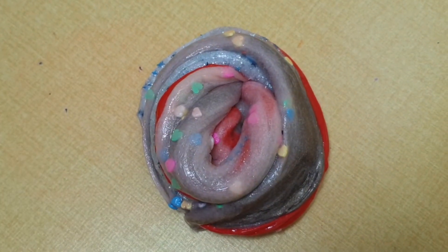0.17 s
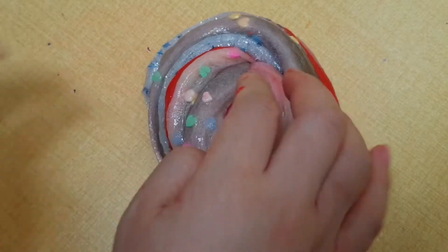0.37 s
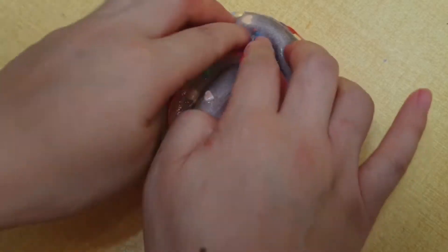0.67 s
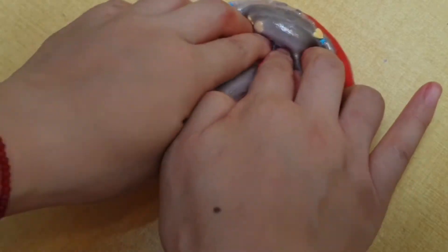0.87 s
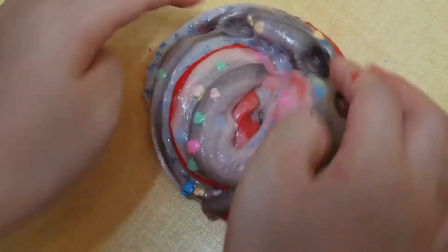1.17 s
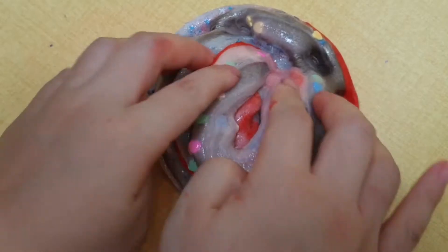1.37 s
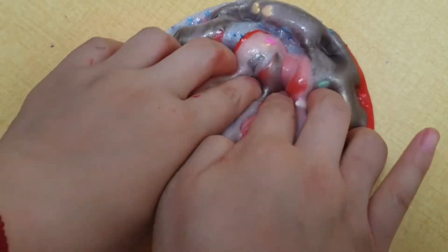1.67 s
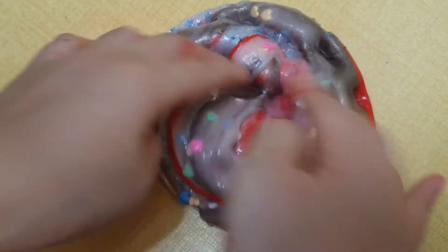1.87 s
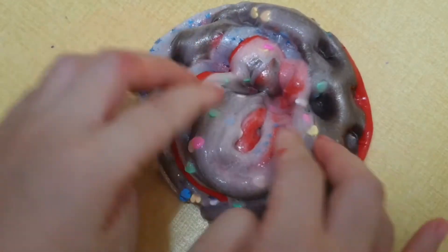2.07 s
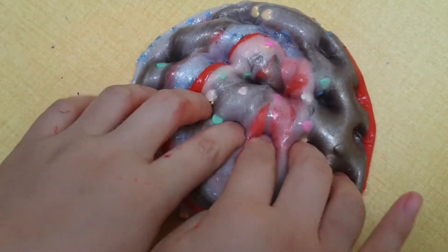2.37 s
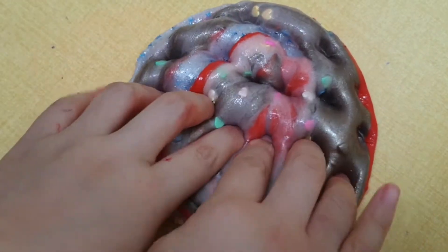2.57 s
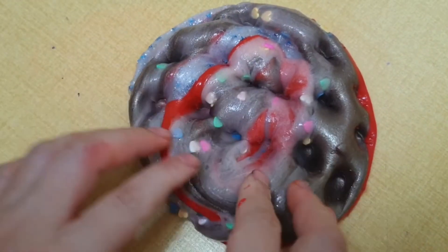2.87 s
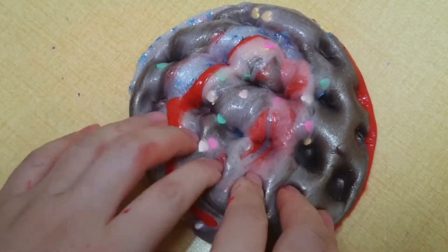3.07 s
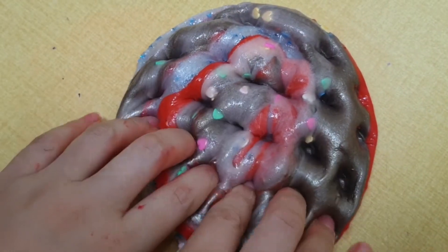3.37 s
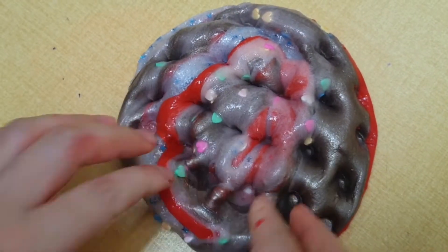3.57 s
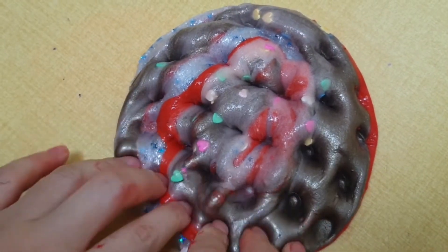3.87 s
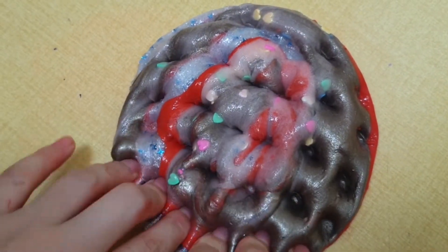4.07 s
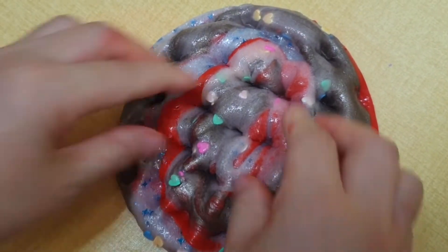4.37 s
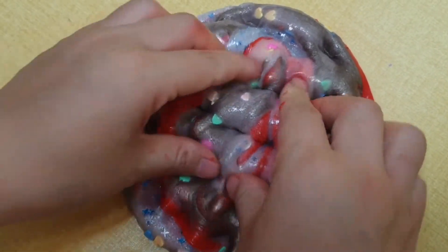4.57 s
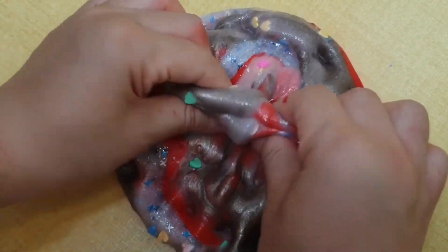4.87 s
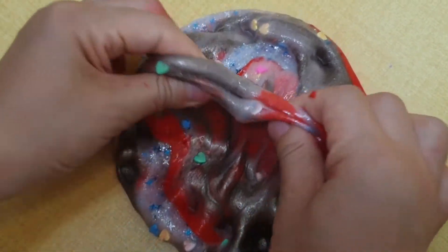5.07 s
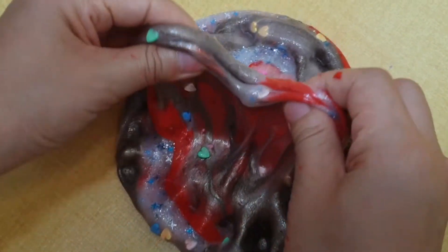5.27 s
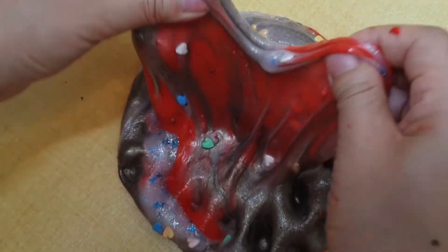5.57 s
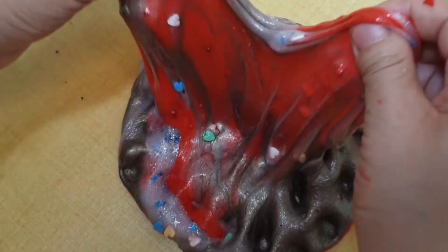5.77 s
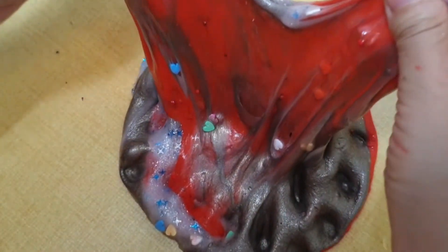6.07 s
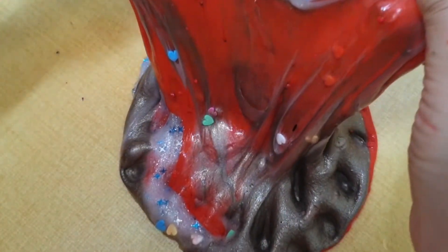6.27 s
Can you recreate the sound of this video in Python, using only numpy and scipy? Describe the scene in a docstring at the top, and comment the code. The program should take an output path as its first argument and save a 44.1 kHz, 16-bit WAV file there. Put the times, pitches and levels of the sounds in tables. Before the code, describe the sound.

A close stereo microphone in a small, hard-surfaced, quiet room, with a faint steady hum, soft hiss and low table rumble. For the first second, hands settle on sticky slime with barely audible fizz. Around 1.05 s fingers pull free in a tight burst of hollow, wet pops and snaps, with smaller clicks to 1.2 s. A dull palm thud comes near 1.45 s. From 1.8 to 1.9 s comes a dense, loud cluster of pops and cracks. Small pops at 2.3 and 2.5 s lead to another sharp cluster at 2.6-2.7 s. Low rumble swells near 3.1 s amid fine crackle and squelch; bright snaps burst at 3.45 s. A soft knock lands at 3.9 s, weaker pops follow at 4.15 s, then a crisp crackling rip at 4.65 s thins out. The remaining stretch is quiet, with tiny ticks, small rising blips near 5.5 s and light clicks around 5.95 s, until about 6.4 s.

```python
"""Small hard room, tabletop: fingers poke, pull out of and stretch a lump of sticky slime by a two-port microphone.
Snapping films are clicks with a short rattle; finger holes and air pockets are decaying, rising tones.
Thousands of faint bursts fizz and small wet tones gurgle as the kneading drives them; the room echoes.
Behind: low-mode noise of the table as the hands lean and palms land, a steady hum, microphone hiss."""
import sys
import numpy as np
from scipy import signal
from scipy.fft import rfft, irfft, next_fast_len
from scipy.io import wavfile
from scipy.ndimage import uniform_filter1d

SR = 44100
rng = np.random.default_rng(int(sys.argv[2]) if len(sys.argv) > 2 else 0)


def magnitude_from_level(level_db):
    """Linear magnitude for a level in decibels (20 dB per decade)."""
    exponent = np.asarray(level_db, float) / 20
    return 10 ** exponent


def master(y):
    """Save y as 16-bit WAV."""
    cut = np.clip(np.atleast_2d(y).T, -1, 1)
    pcm = np.round(cut * 32767)  # scale
    wavfile.write(sys.argv[1], SR, pcm.astype(np.int16))


N = 283562


def unit(x):
    """Rows brought to rms 1."""
    return x / np.sqrt(np.mean(x ** 2, axis=-1, keepdims=True) + 1e-20)


def along(points, hz):
    """(Hz, value) points interpolated on a log frequency axis."""
    f, v = np.transpose(points)
    return np.interp(np.log(hz + 1), np.log(f + 1), v)


def curve(rows, column, s):
    """One column of a table at times s."""
    return np.interp(s, np.transpose(rows)[0], np.transpose(rows)[column])


def noise(spectrum, alike):
    """Shaped stereo noise of rms 1; alike is the left-right correlation."""
    m = next_fast_len(N)
    gain = magnitude_from_level(along(spectrum, np.fft.rfftfreq(m, 1 / SR)))
    a, b = unit(irfft(rfft(rng.standard_normal((2, m))) * gain, m)[:, :N])
    turn = np.arccos(np.clip(alike, 0, 1)) / 2
    return np.cos(turn) * a + np.sin(turn) * np.array([b, -b])


def place(s, sounds, pan_db):
    """Sums stereo sounds (events, 2, samples) at their times; pan_db is left over right."""
    start = np.round(np.clip(s, 0, None) * SR).astype(int)
    at = start[:, None] + np.arange(sounds.shape[-1])
    gains = magnitude_from_level(np.array([pan_db, -pan_db]) / 2)
    return np.array([np.bincount(at.ravel(), (g[:, None] * sounds[:, c]).ravel(), N + SR)[:N]
                     for c, g in enumerate(gains)])


def bursts(s, db, bright_db_oct, pan_db, t60_s, ring_db):
    """A film snaps as a click and a short rattle, a little different at each port, later at the right."""
    # spectrum of a bursting film: (frequency [Hz], relative level [dB])
    film = [(800, -17.5), (2000, -7), (4000, -4.5), (5500, -1.5), (7500, 1.5), (9500, -1), (12000, -1),
            (15500, -1.5), (16600, -35.5), (19000, -69)]
    t, hz = np.arange(-64, 448) / SR, np.fft.rfftfreq(512, 1 / SR)
    raw = rng.standard_normal((len(s), 3, len(t)))
    rattle = (raw[:, :1] + raw[:, 1:]) * magnitude_from_level(-60 * t / t60_s) * (t > 0)
    click = 3 * (t == 0)
    spectrum = rfft(rattle + click)
    spectrum = spectrum / np.sqrt(uniform_filter1d(abs(spectrum) ** 2, size=9) + 1e-9)  # no pitch of its own
    octaves = np.log2(np.clip(hz, 1500, 15000) / 8000)
    tilt_db = bright_db_oct[:, None, None] * octaves  # smaller bubbles are brighter
    tilt_db = tilt_db + ring_db / (1 + ((hz - 7500) / 900) ** 2)  # a resonance near 7.5 kHz
    lag_s = np.array([[0], [.00007]])
    lag = np.exp(-2j * np.pi * hz * lag_s)
    pair = irfft(spectrum * magnitude_from_level(along(film, hz) + tilt_db) * lag)
    size = np.sqrt(np.sum(pair ** 2, axis=(1, 2), keepdims=True) / (.002 * SR))  # two ports, 1 ms each
    return place(s + t[0], magnitude_from_level(db)[:, None, None] * pair / size, pan_db)


def pockets(s, db, hz, cycles, pan_db, rise, rough):
    """A pocket rings for some cycles (to -60 dB), pitch climbing as its mouth widens; wet walls make it flutter."""
    turns = hz[:, None] * np.arange(1400) / SR
    age = turns / np.clip(cycles, 2, 40)[:, None]
    ring = np.sin(2 * np.pi * turns * (1 + rise * (np.minimum(age, 1) - .15)))
    flutter = unit(uniform_filter1d(rng.standard_normal(turns.shape), size=40))
    decay = magnitude_from_level(db[:, None] - 60 * age)
    onset = (1 - np.exp(-turns / 0.25)) ** 2
    ring = ring * (1 + rough * flutter) * decay * onset
    later = np.roll(ring, shift=3, axis=1)
    return place(s, np.stack([ring, later], axis=1), pan_db)


def snaps():
    """Single films tear and bubbles burst."""
    # films and bubbles: (time [s], level over 1 ms [dB], brightness [dB/octave], left over right [dB])
    films = [(0.332, -55.5, 8, 7), (0.8704, -46.5, 6, -12.5), (1.0633, -20, -8, 1), (1.0715, -26, -7, -2),
             (1.158, -41, 6, 0.5), (1.1821, -41.5, 14, -1.5), (1.4429, -51.5, 7, -4),
             (1.8028, -16.5, -3.5, -1.5), (1.8059, -15.5, -5.5, 1.5), (1.8328, -17, 7, -6),
             (1.8394, -16, 3.5, -1.5), (1.8461, -29, 9, 1.5), (1.8877, -23, -1, -4), (2.2157, -38.5, 1, -2),
             (2.2749, -26, 16, -3.5), (2.3683, -37.5, 5.5, -0.5), (2.5825, -40, 8, 1),
             (2.6071, -23.5, -0.5, 1.5), (2.646, -12.5, 4.5, -2), (2.652, -24, 2.5, -1.5),
             (2.666, -33.5, 2, 0), (2.684, -26, 0.5, 1.5), (3.2651, -54, 19, -6.5), (3.434, -20, 9.5, 2.5),
             (3.437, -17.5, 3, 1.5), (3.4378, -19.5, 3, -1), (3.4729, -15.5, -2, -1.5),
             (3.6474, -40.5, 11.5, -1), (3.9257, -43.5, -2, 0.5), (3.9887, -42, 4.5, -3.5),
             (4.133, -28, 0, 3), (4.135, -26.5, 1, 0.5), (4.158, -31, -2, -1), (4.5766, -44, 2.5, -2),
             (4.6348, -19.5, 1.5, 4.5), (4.676, -15, 10, -3), (4.803, -36, 8, -1.5), (4.826, -34, 6.5, -12),
             (4.8421, -37.5, 6, 9.5), (4.929, -40, 1, 1.5), (4.9902, -41, 5, 4.5), (5.008, -38, 0.5, 4),
             (5.0267, -46, 1.5, -6), (5.031, -43, 11, 0.5), (5.0347, -38.5, 16, 0.5), (5.1603, -42, 11, 3),
             (5.178, -46, 18, 3.5), (5.2653, -42, 5.5, -2.5), (5.5674, -28.5, 3.5, -0.5),
             (5.9436, -41, -1.5, 2.5), (6.141, -51.5, 0, 1), (6.297, -55, -4, -0.5)]
    s, db, bright_db_oct, pan_db = np.transpose(films)
    ring_db = 3.5 + np.clip(-.8 * (db + 42), 0, 12)[:, None, None]  # quieter snaps ring more near 7.5 kHz
    return bursts(s, db, bright_db_oct, pan_db, t60_s=0.005, ring_db=ring_db)


def plops():
    """Air pockets and finger holes ring as they open."""
    # openings: (time [s], level [dB], nominal pitch [Hz], ringing [cycles, held to 2..40])
    openings = [(0.7235, -51, 826, 8.8), (1.0309, -41, 390, 11), (1.045, -19.5, 1680, 10.4),
                (1.0541, -13, 1485, 14.9), (1.0564, -14, 1820, 13), (1.063, -30.5, 343, 6.8),
                (1.0635, -24.5, 860, 8.9), (1.0646, -15.5, 2800, 11), (1.067, -19.5, 1780, 11.9),
                (1.1416, -29, 1300, 4.2), (1.154, -42, 1390, 4.2), (1.522, -53, 1250, 11),
                (1.54, -51.5, 1600, 12), (1.5745, -49, 762, 12), (1.576, -49, 1200, 16),
                (1.627, -38, 331, 7.7), (1.8005, -22, 800, 16), (1.8008, -20.5, 1820, 11.6),
                (1.8019, -14.5, 404, 9.6), (1.8141, -22.5, 1117, 17), (1.833, -16.5, 1580, 20.6),
                (1.836, -11.5, 814, 13.4), (1.8387, -10.5, 2400, 10.7), (1.8522, -16, 870, 9.2),
                (1.869, -27, 810, 7.5), (1.887, -22, 1770, 13.5), (1.923, -30, 876, 12),
                (2.3286, -49.5, 1120, 54), (2.4153, -51.5, 375, 18), (2.4862, -24, 1144, 11.6),
                (2.4868, -29, 780, 9.5), (2.4875, -26, 420, 8.87), (2.6085, -28.5, 2850, 27),
                (2.6065, -24.5, 734, 9.9), (2.608, -29, 1265, 15), (2.6082, -22, 467, 13.7),
                (2.638, -18.5, 1490, 8.1), (2.645, -13, 1610, 10.5), (2.6466, -19.5, 780, 12.5),
                (2.65, -20, 445, 9.5), (2.6445, -18, 2870, 26), (2.652, -13.5, 730, 11.9),
                (2.683, -24.5, 583, 11), (2.739, -29.5, 590, 6.6), (3.113, -40.5, 1094, 17.6),
                (3.128, -41, 1210, 11.3), (3.164, -40.5, 1170, 14), (3.184, -46.5, 1130, 18),
                (3.2655, -31.5, 1530, 10.4), (3.266, -41, 2900, 18), (3.2665, -42.5, 693, 11),
                (3.436, -25, 385, 15.6), (3.4354, -20.5, 1123, 18), (3.4364, -24, 2170, 15),
                (3.4365, -19, 754, 17.5), (3.466, -25.5, 720, 8.5), (3.4693, -17, 1560, 11),
                (3.4721, -16.5, 1790, 12.7), (3.4725, -15, 7600, 28), (4.1232, -32, 8200, 22),
                (4.134, -33, 2000, 13), (4.147, -35, 1093, 11), (4.1492, -35, 700, 8),
                (4.166, -38, 1520, 8.6), (4.5035, -50.5, 2200, 11), (4.503, -37.5, 1098, 6),
                (4.5044, -36.5, 405, 9.3), (4.5501, -42, 8200, 25), (4.6318, -35, 410, 7.9),
                (4.6754, -35, 2525, 19), (4.929, -29, 5900, 14), (4.9293, -31, 4400, 14),
                (5.45, -60, 1803, 23), (5.468, -52, 1890, 38), (5.482, -48.5, 2000, 29),
                (5.51, -52.5, 2110, 21), (5.9445, -39, 2800, 14), (5.9427, -43, 794, 10.7)]
    pan_db = rng.normal(-1.1, 4.42, len(openings))
    return pockets(*np.transpose(openings), pan_db=pan_db, rise=0.012, rough=0.44)


def rips(count=11):
    """A ripping sheet is a quick run of snaps gathering force in uneven steps, scattered left and right."""
    # ripping sheets: (start [s], length [s], final mean level [dB], mean brightness [dB/octave])
    sheets = [(1.026, 0.014, -34, 3), (1.041, 0.0079, -24.5, -0.5), (1.83, .011, -18.5, -1),
              (2.637, .013, -16.5, -2), (3.463, .011, -19.5, -2), (4.677, 0.06, -29, 13)]
    at, length, db, bright_db_oct = np.transpose(sheets)[..., None]
    u, g = rng.random((len(sheets), count)), rng.standard_normal((len(sheets), count, 3))
    step = np.arange(count)
    s = at + length * (step + .8 * u) / count
    level_db = db - 6.0 * (1 - step / count) ** 2 + 1.3 * g[..., 0]
    rows = s, level_db, bright_db_oct + 3 * g[..., 1], -1.5 + 4 * g[..., 2]
    return bursts(*(r.ravel() for r in rows), t60_s=0.005, ring_db=2.5)


def swell(s, at, rise_s, fade_s, hold_s=0):
    """dB re peak at times s, a row per gesture: straight rise, hold, straight fade; rise and fade per 20 dB."""
    late = s - np.reshape(at, (-1, 1))
    rise, fade, hold = (np.reshape(v, (-1, 1)) for v in (rise_s, fade_s, hold_s))
    return -20 * (np.maximum(-late, 0) / rise + np.maximum(late - hold, 0) / fade)


def kneading(s):
    """Fizz dB, squelch dB and squelch pitch at times s: gestures add up, the wettest sets the pitch."""
    # presses, stretches: (peak time [s], fizz drive [dB], squelch drive [dB], pitch [Hz], fade per 20 dB [s])
    presses = [(.35, -66, -76, 893, 0.1), (.8, -68.5, -62.5, 1118, 0.26), (1.57, -72, -62, 1240, 0.05),
               (2.24, -59, -65.5, 1484, 0.11), (2.33, -66, -59, 1109, 0.14), (2.5, -72, -54, 901, 0.03),
               (3.13, -54, -57, 1287, 0.14), (3.95, -64.5, -57, 1593, 0.22), (4.515, -72, -55.5, 950, 0.03),
               (4.7, -47, -86.5, 1970, 0.21), (4.95, -62, -66, 1246, 0.64), (5.3, -66, -81, 1500, 0.5),
               (5.479, -60, -69.5, 1980, 0.0031), (6.2, -67.5, -89, 1490, 0.43)]
    # fingers pulling out of their holes: (time of letting go [s], fizz drive [dB], squelch drive [dB])
    pulls = [(1.062, -31, -36.5), (2.638, -33, -38), (3.465, -26.5, -68.5), (4.155, -35, -38)]
    swell_share, rest_db = .35, -88  # rise time over fade time of a press; drive of the lump at rest
    pull_s, let_go_s, pull_hz = .035, .01, 1350  # rise and fade per 20 dB, pitch
    at, fizz_db, wet_db, hz, fade = np.transpose(presses)
    pull_at, pull_fizz_db, pull_wet_db = np.transpose(pulls)
    shape_db = np.vstack([swell(s, at, swell_share * fade, fade), swell(s, pull_at, pull_s, let_go_s)])
    fizzing = magnitude_from_level(shape_db + np.r_[fizz_db, pull_fizz_db][:, None])
    wet = magnitude_from_level(shape_db + np.r_[wet_db, pull_wet_db][:, None])
    pitch_hz = np.r_[hz, pull_hz + 0 * pull_at][wet.argmax(axis=0)]
    return *(20 * np.log10(g.sum(axis=0) + magnitude_from_level(rest_db)) for g in (fizzing, wet)), pitch_hz


def fizz(count=5000):
    """Countless small bubbles burst, a few much larger than the rest; harder kneading bursts them faster."""
    u, g = rng.random((count, 2)), rng.standard_normal((count, 2))
    t = np.arange(0, N, 32) / SR
    crowd = magnitude_from_level(.3 * kneading(t)[0])
    s = np.interp(u[:, 0], np.cumsum(crowd) / np.sum(crowd), t)
    effort_db = kneading(s)[0]
    db = 0.87 * effort_db - 13.5 - 2.495 * np.log(u[:, 1] + 0.016)
    ring_db = np.clip(-.45 * (effort_db + 44.5), 0, 14)  # gentle fizz is more coloured near 7.5 kHz
    db = db - .2 * ring_db * (np.log(u[:, 1] + .002) + 2)  # and lets single ticks stand out
    bright_db_oct, pan_db = -.5 + 4 * g[:, 0], -1.5 + 4 * g[:, 1]
    return bursts(s, db, bright_db_oct, pan_db, t60_s=0.0021, ring_db=ring_db[:, None, None])


def squelch(count=1800):
    """Small wet pockets gurgle, scattered about the pitch of the hole being worked."""
    u, g = rng.random((count, 2)), rng.standard_normal((count, 2))
    s = u[:, 0] * N / SR
    _, wet_db, hole_hz = kneading(s)
    db = wet_db - 3.4 * np.log(u[:, 1] + 0.019)
    hz = hole_hz * np.exp(0.37 * g[:, 0])
    return pockets(s, db, hz, 12 + 0 * s, 4 * g[:, 1], rise=0.092, rough=0.14)


def room(x, size=1764):
    """Walls echo, then a diffuse tail, drawn afresh every size samples."""
    # decay of the tail after its hold: (frequency [Hz], t60 [s])
    decay = [(200, 0.25), (1400, 0.26), (3700, 0.27), (9700, 0.27), (16000, 0.26)]
    # near surfaces and a far wall: (delay [s], level [dB])
    walls = [(.0023, -17), (.0047, -19.5), (.0068, -18), (.05, -20)]
    hold_s = 0.016  # early echoes keep the tail level
    parts = np.pad(x, ((0, 0), (0, -N % size))).reshape(2, -1, size)
    hz, t, z = signal.stft(rng.standard_normal((2, parts.shape[1], SR // 2)), SR, nperseg=256)
    alike = 1 / (1 + (hz[:, None] / 300) ** 2)  # long waves reach both ports alike
    z = np.sqrt(alike) * z[:1] + np.sqrt(1 - alike) * z[::-1]
    fade = magnitude_from_level(-60 * np.maximum(t - hold_s, 0) / along(decay, hz)[:, None])
    less_bass = (hz / (hz + 250))[:, None]  # a small room holds less bass
    tails = signal.istft(z * fade * less_bass, SR, nperseg=256)[1]
    tails = tails * (1 - np.exp(-np.arange(tails.shape[-1]) / SR / 0.00046))  # the tail builds up
    lumps = uniform_filter1d(rng.standard_normal(tails.shape[1:]), size=130)
    tails = tails * magnitude_from_level(3.2 * unit(lumps))  # echoes arrive in clumps
    tails = magnitude_from_level(-1.5) * tails / np.linalg.norm(tails, axis=-1, keepdims=True)
    for s, db in walls:
        tails[..., round(s * SR)] += magnitude_from_level(db)
    wet, out = signal.fftconvolve(parts, tails, axes=-1), np.zeros((2, N + SR))
    for k in range(parts.shape[1]):
        out[:, k * size:][:, :wet.shape[-1]] += wet[:, k]
    return out[:, :N]


def table():
    """Two low modes of the table rumble, stronger at the right port; soft thuds come when palms land."""
    # weight on the table: (time [s], rumble ahead of port gains [dB], part in the upper mode [dB])
    lean = [(0, -61, -13), (.36, -60.5, -2.5), (.9, -57, -6.5), (1.36, -57, -9), (1.7, -53, -4.5),
            (1.9, -58, -10.5), (2.27, -53, -5.5), (2.72, -63, -4.5), (3.06, -43.5, -9), (3.19, -52.5, -5),
            (3.27, -46, -9), (3.6, -53.5, -1.5), (4.05, -46, -3), (4.3, -53, -2), (4.75, -62, -4.5),
            (5.5, -56, -8), (6.43, -60, -7)]
    # lower mode, then upper mode, each: (frequency [Hz], relative density [dB per Hz])
    modes = [
        [(20, -24), (40, -3.5), (62, 9.5), (80, 2), (120, -30), (170, -89.5)],
        [(55, -35.5), (75, 8), (90, 9), (105, 7.5), (140, -21), (200, -90)],
    ]
    # spectrum of a thud: (frequency [Hz], relative density [dB per Hz])
    thud_spectrum = [(70, -17.5), (120, 3), (220, 1.5), (330, -8), (480, -12), (600, -30), (900, -61.5)]
    # palms landing: (time [s], hold [s], thud [dB], upper-mode knock ahead of port gains [dB])
    landings = [(1.429, 0.051, -44, -53), (3.771, 0.069, -65, -56), (3.921, 0.047, -46.5, -35.5)]
    land_s, settle_s, knock_s = 0.02, 0.13, 0.063  # per 20 dB: rise, fade of the thud, fade of the knock
    t = np.arange(N) / SR
    upper = np.clip(magnitude_from_level(curve(lean, 2, t)), 0, .98)
    low, high = (noise(mode, alike=0.84) for mode in modes)
    weight = magnitude_from_level(curve(lean, 1, t))
    at, hold, thud_db, knock_db = np.transpose(landings)
    thud = magnitude_from_level(thud_db) @ magnitude_from_level(swell(t, at, land_s, settle_s, hold))
    thud = thud * magnitude_from_level(3.3 * unit(uniform_filter1d(rng.standard_normal(N), size=700)))  # palms land unevenly
    knock = magnitude_from_level(knock_db) @ magnitude_from_level(swell(t, at, land_s, knock_s, hold))
    lower_rumble = weight * np.sqrt(1 - upper ** 2) * low * magnitude_from_level([[-1.5], [1.5]])
    upper_rumble = (weight * upper + knock) * high
    deep = (lower_rumble + upper_rumble) * magnitude_from_level([[-2.6], [2.2]])
    return deep + thud * noise(thud_spectrum, alike=0.85)


def hum():
    """Steady household hum, as low shaped noise nearly alike at both ports."""
    # spectrum: (frequency [Hz], relative level [dB])
    hum_spectrum = [(60, -55), (110, -15.5), (147, -7.5), (180, -18.5), (230, -20.5), (400, -34),
                    (1000, -64.5)]
    return magnitude_from_level(-66.0) * noise(hum_spectrum, alike=.9)


def hiss():
    """The microphone's own noise, independent at each port."""
    # spectrum: (frequency [Hz], relative level [dB])
    hiss_spectrum = [(320, -7), (640, -12.5), (1130, -15), (8000, -24.5), (12500, -18), (15700, -18.5),
                     (16300, -34.5), (17000, -91)]
    return magnitude_from_level(-66.0) * noise(hiss_spectrum, alike=0)


def scene():
    """Slime in its room over the table's rumble and the hum."""
    small = signal.butter(N=3, Wn=260, btype="high", fs=SR, output="sos")  # so small a lump radiates no bass
    slime = signal.sosfilt(small, snaps() + plops() + rips() + fizz() + squelch())
    return slime + room(slime) + table() + hum()


def roll_off(x):
    """The treble ends steeply here."""
    return signal.sosfilt(signal.butter(12, 17100, fs=SR, output="sos"), x)


def record(dry):
    """The microphone passes its band, adds hiss at each port and rounds off loud peaks."""
    band = signal.butter(N=4, Wn=(51.94, 14600), btype="band", fs=SR, output="sos")
    x = signal.sosfilt(band, dry) + hiss()
    x = x / (1 + abs(x / .72) ** 4) ** (1 / 4)  # the input stage rounds off the loudest peaks
    lowpass = signal.butter(N=12, Wn=16800, fs=SR, output="sos")  # removes top treble the rounding adds
    x = signal.sosfiltfilt(lowpass, x)
    return roll_off(x)


dry = scene()
out = record(dry)
master(out)
```